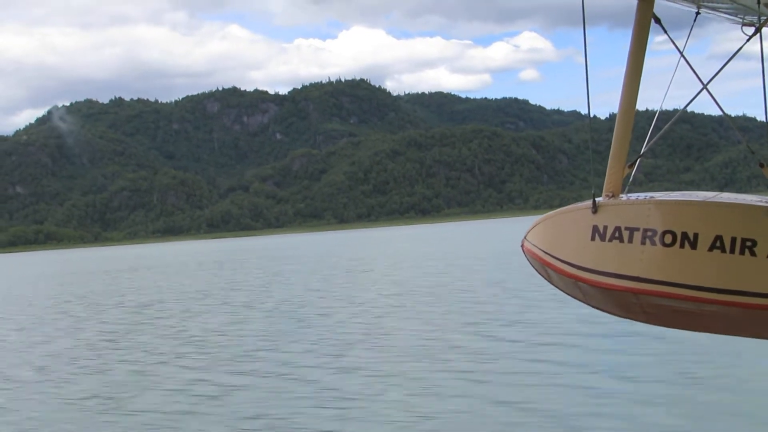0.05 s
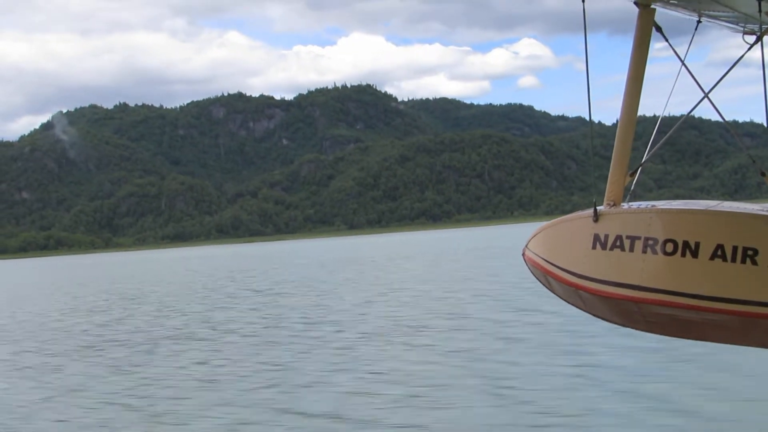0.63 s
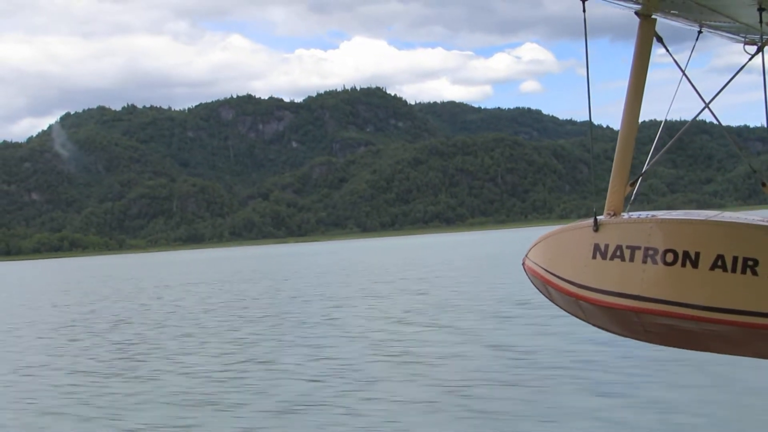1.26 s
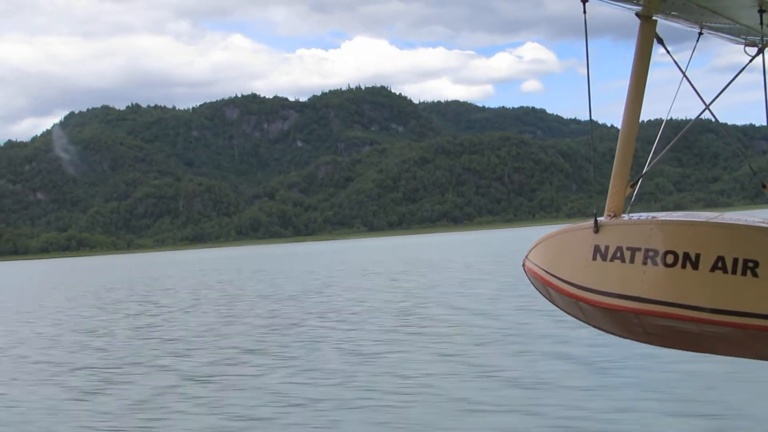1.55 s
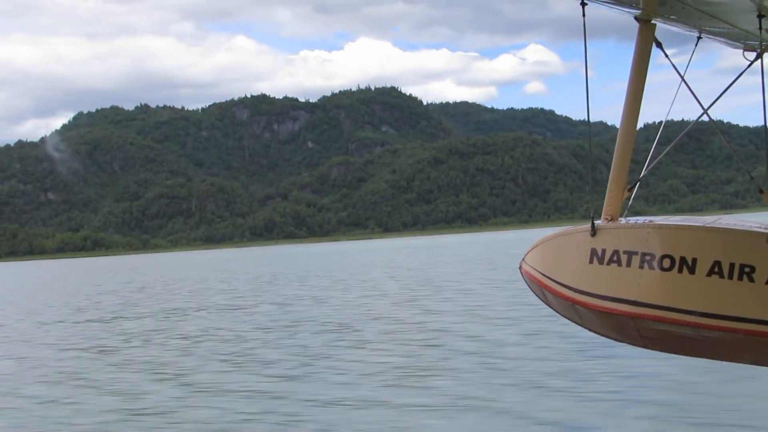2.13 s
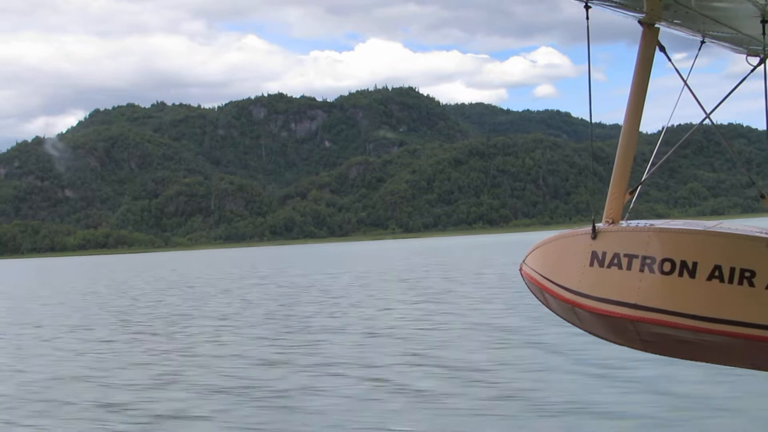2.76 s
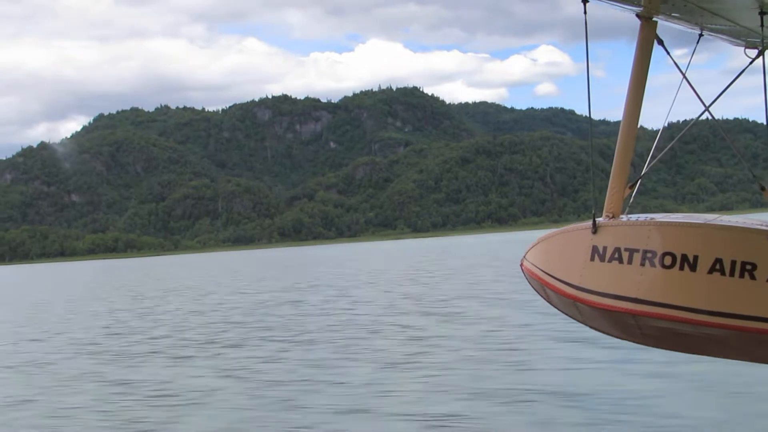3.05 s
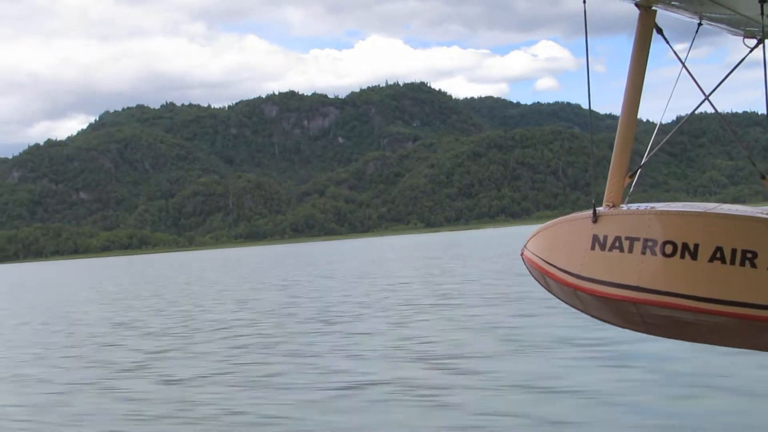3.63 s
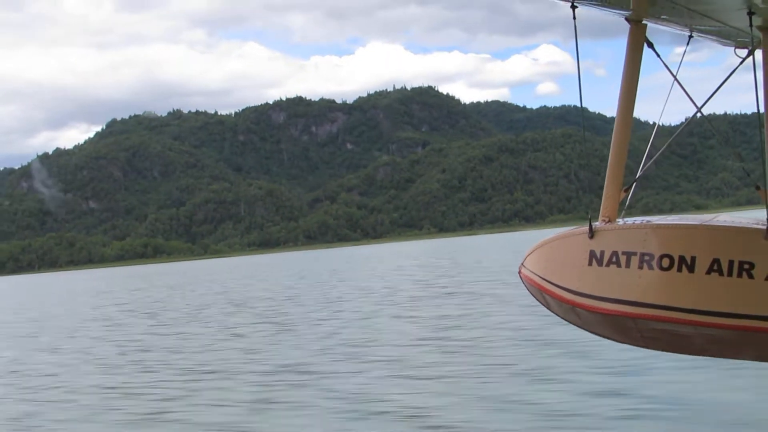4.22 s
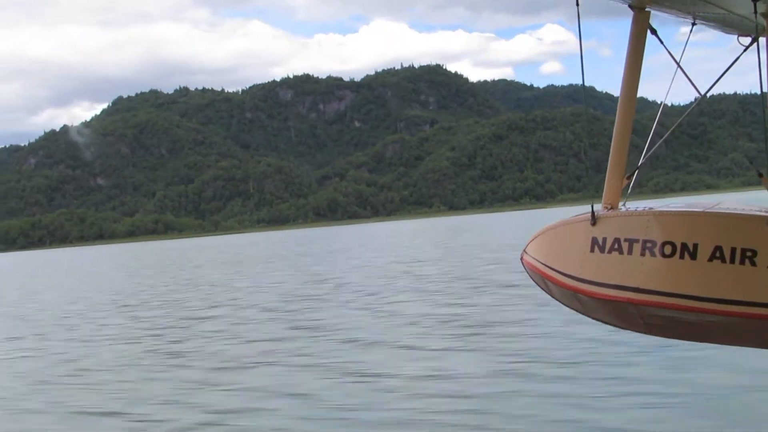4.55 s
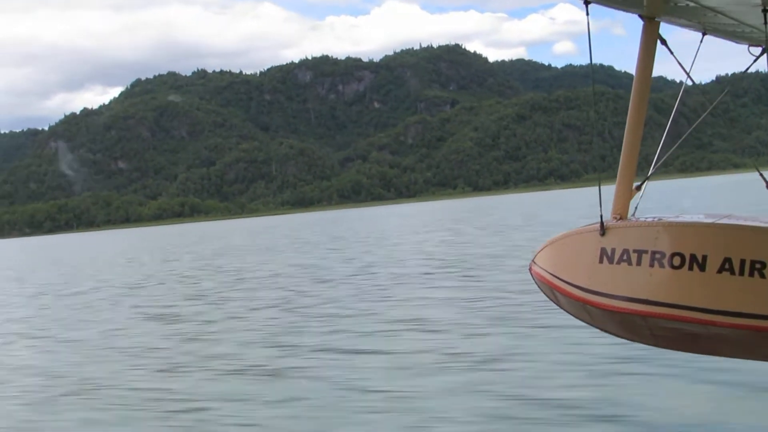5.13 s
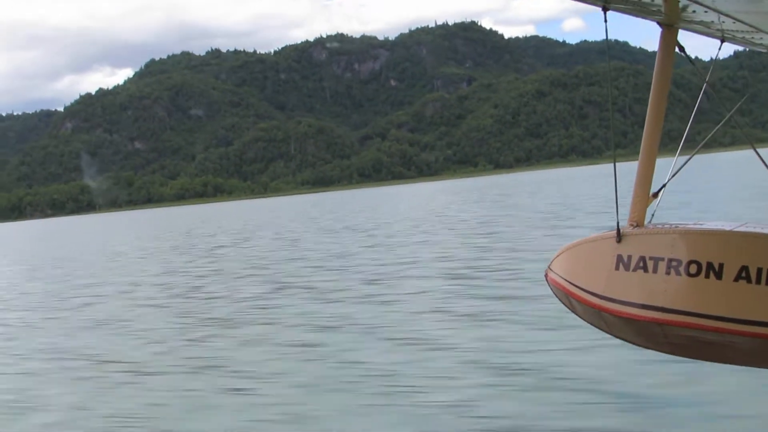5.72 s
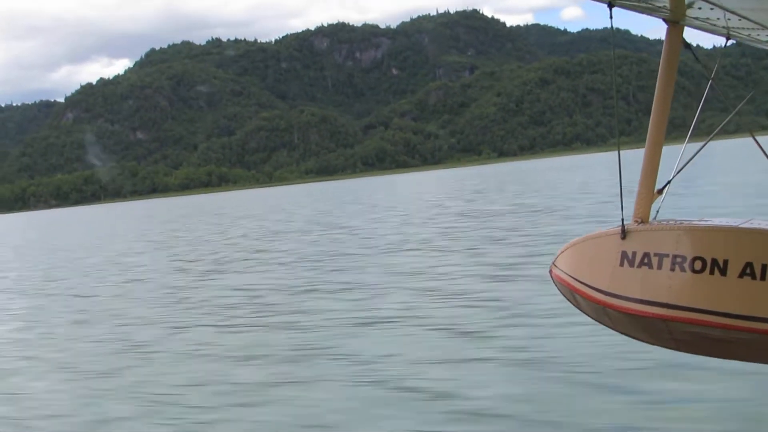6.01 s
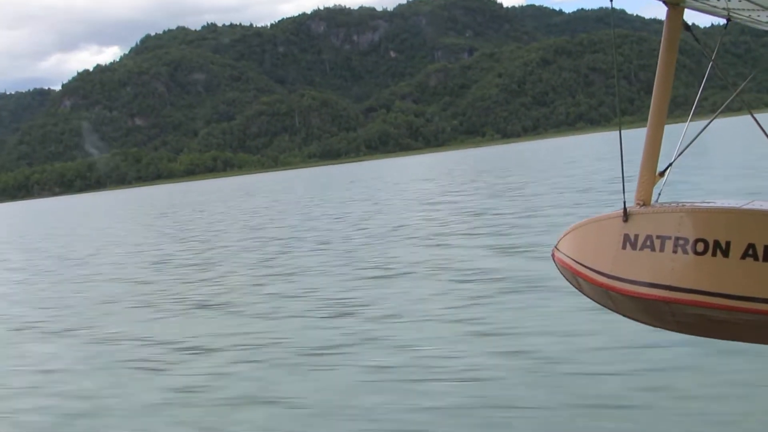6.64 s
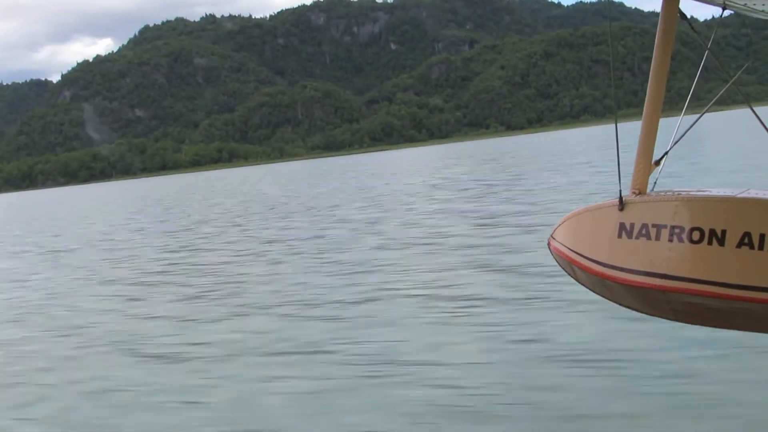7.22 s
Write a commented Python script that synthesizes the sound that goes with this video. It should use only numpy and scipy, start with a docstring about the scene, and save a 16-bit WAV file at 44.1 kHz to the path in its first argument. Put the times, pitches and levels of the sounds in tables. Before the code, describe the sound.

A seaplane lands on water, heard from inside: throbbing engines and wind give way to rushing spray and hull rumble.

```python
"""A twin-engined seaplane settles on a lake, heard from a stereo microphone inside the cabin.
First two nine-cylinder radials, slightly out of step, throb and rasp over the slipstream.
After three seconds the hull touches and skims the water, and single sharp crackles dot the drone.
Then the engines are throttled back; hull rumble, low thumps and the hiss of spray take over."""
import sys
import numpy as np
from scipy import signal
from scipy.fft import rfft, irfft
from scipy.io import wavfile
from scipy.ndimage import uniform_filter1d

SR = 44100
rng = np.random.default_rng(int(sys.argv[2]) if len(sys.argv) > 2 else 0)


def wav_out(sig):
    """Save sig, one row per channel (or a flat mono array), as 16-bit PCM at SR to the path in sys.argv[1]."""
    wavfile.write(sys.argv[1], SR, np.round(np.clip(np.atleast_2d(sig).T, -1, 1) * 32767).astype(np.int16))


N = 329427
TIME = np.arange(N) / SR
FREQS = np.fft.rfftfreq(N, 1 / SR)


def amp(db):
    """Decibels to gain."""
    return 10 ** (np.asarray(db) / 20)


def unit(x):
    """Scales to rms 1."""
    return x / np.sqrt(np.mean(x ** 2) + 1e-20)


def over_time(rows):
    """Each column of a time table, at every sample."""
    times_s, *columns = np.transpose(rows)
    return [np.interp(TIME, times_s, column) for column in columns]


def spectrum(rows):
    """A frequency table at every bin, joined up on a log-frequency axis."""
    hz, values = np.transpose(rows)
    return np.interp(np.log(FREQS + 1), np.log(hz), values)


def wander(rate_hz):
    """Random drift of rms 1."""
    knots = rng.standard_normal(4096)
    return unit(np.interp(TIME * rate_hz, np.arange(len(knots)), knots))


def stereo_noise(shape_db):
    """Coloured noise on two channels, alike in the bass and nearly unrelated in the high treble."""
    # likeness of left and right: frequency_hz, correlation
    likeness = [(30, 0.99), (250, 0.99), (400, 0.85), (600, 0.22), (900, 0.83), (1400, 0.75), (2500, 0.59),
                (5000, 0.64), (8000, 0.1), (13000, -0.2)]
    correlation = np.clip(spectrum(likeness), -1, 1)
    mid, side = rfft(rng.standard_normal((2, N))) * amp(shape_db)
    mid, side = mid * np.sqrt(1 + correlation), side * np.sqrt(1 - correlation)
    return unit(irfft([mid + side, mid - side], N))


def resonance_db(hz, centre_hz, width_hz, peak_db):
    """Bell-shaped lift around one resonance."""
    return peak_db / (1 + (2 * (hz - centre_hz) / width_hz) ** 2)


def cabin_boom_db(hz):
    """The air in the cabin booms as a note slides into its resonance."""
    return resonance_db(hz, centre_hz=181.3, width_hz=9.7, peak_db=3.75)


def slipstream(level_db=-43.5):
    """Air rushes steadily past outside, and the struts and wires sing faintly in it."""
    # air over the cabin: frequency_hz, density_db
    rush = [(100, -6.5), (450, -3), (650, 1.5), (900, 1.5), (1150, -2), (1500, -1.5), (1950, -5),
            (3200, -5.5), (3800, -6), (5000, -12), (7000, -14.5), (10500, -18.5), (13000, -20),
            (14500, -29.5)]
    # whistles of the rigging: pitch_hz, width_hz, above_rush_db
    wires = [(821, 50, 7), (920, 80, 4), (1368, 40, 6), (2250, 200, 2), (2703, 70, 4), (3050, 150, 4),
             (4380, 70, 5), (4680, 130, 4)]
    whistles_db = sum(resonance_db(FREQS, *wire) for wire in wires)
    return amp(level_db + .5 * wander(60)) * stereo_noise(spectrum(rush) + whistles_db)


def water_contact(touch_s=3.19, settle_s=0.16):
    """Gains of sheets, mist and rumble: they start at touchdown, follow the drag and ride the waves."""
    # how hard the hull ploughs the lake: time_s, drag_db
    plough = [(3.4, -20), (4.2, -13.5), (4.48, -8), (5.0, -6), (5.7, -3), (6.4, -0.76), (7.25, .5),
              (7.47, -1.5)]
    # wave crests (+) and troughs (-): middle_s, half_length_s, sheets_db, mist_db, rumble_db
    waves = [(3.636, 0.29, 9.5, 13.5, 7), (4.595, 0.14, 2, 6.5, 0), (4.8, 0.11, 1, -2, 2),
             (5.203, 0.053, 2.5, 3, 4), (5.288, 0.023, -.5, 1, -8), (5.686, 0.19, -0.4, -2, -3),
             (7.15, 0.062, 0, 0, 2.5)]
    drag_db, = over_time(plough)
    sheets_db = -28 + drag_db
    mist_db = -33.5 + 1.46 * drag_db
    rumble_db = -17 + 0.44 * drag_db
    waves_db = sum(np.outer(dbs, np.exp(-((TIME - s) / half_s) ** 2)) for s, half_s, *dbs in waves)
    contact = np.clip((TIME - touch_s) / settle_s, 0, 1)
    return contact * amp(np.array([sheets_db, mist_db, rumble_db]) + waves_db)


def spray(sheets_gain, mist_gain, flutter_db=0.88, grain_db=0.4):
    """Just outside, sheets of water rush past and break into a hissing mist of drops."""
    # rushing water: frequency_hz, density_db
    sheets_colour = [(150, -1.5), (450, -0.5), (680, -5), (830, 0), (1100, 0), (1400, 1.5), (2200, -3),
                     (3000, -8), (3700, -15), (5000, -29), (9000, -30.5)]
    # fine drops: frequency_hz, density_db
    mist_colour = [(1000, -10), (3000, 6.5), (4700, -0.5), (6500, -3), (8500, -7), (10500, -7),
                   (13000, -11), (14000, -23), (14600, -27)]
    sheets = sheets_gain * stereo_noise(spectrum(sheets_colour))
    mist = mist_gain * stereo_noise(spectrum(mist_colour))
    splashes = unit(amp(flutter_db * wander(45) + grain_db * wander(830)))
    return splashes * (sheets + mist)


def hull(rumble_gain, airframe_db=-38.5, lumps_db=1.0, boom_share=0.75):
    """The cabin rumbles faintly aloft, and hard as the hull ploughs the water."""
    # rumble inside the cabin: frequency_hz, density_db
    rumble_colour = [(15, -22), (30, -20), (45, -4), (62, 2.5), (90, -5.5), (115, -4.5), (150, -2),
                     (180, 1.5), (222, -6.5), (270, -2.5), (330, -9.5), (420, -17.5), (600, -31.5),
                     (1200, -63.5)]
    # lift of the rumble below 100 Hz: time_s, gain_db
    deep_lift = [(0, -12), (1.8, 0.5), (3.2, -2.5), (4.2, 1.5), (4.7, -2), (5.4, -3), (7.2, 1.5)]
    deep_db, = over_time(deep_lift)
    rumble = stereo_noise(spectrum(rumble_colour) + boom_share * cabin_boom_db(FREQS))
    deep = signal.sosfiltfilt(signal.butter(4, 100, fs=SR, output="sos"), rumble)
    rumble += (amp(deep_db) - 1) * deep
    return np.hypot(rumble_gain, amp(airframe_db)) * amp(lumps_db * wander(22)) * rumble


def crackles_and_thumps():
    """Single sharp crackles in the drone, then low thumps."""
    # short damped pulses: start_s, level_db, pitch_hz, swell_s
    pulses = [(3.66, -8.5, 377, 0.0011), (3.725, -16, 440, .0008), (3.779, -14, 440, 0.00087),
              (3.846, -18, 500, 0.00054), (3.961, -17.5, 480, 0.00064), (4.056, -21, 480, 0.0009),
              (4.204, -22, 560, .0006), (5.066, -8, 188, 0.0032), (5.203, -9.5, 194, 0.0043),
              (6.441, -19, 430, 0.0045)]
    out = np.zeros(N)
    for start_s, level_db, pitch_hz, swell_s in pulses:
        age = np.maximum(TIME - start_s, 0)
        swell = age / swell_s
        out -= amp(level_db) * swell * np.exp(1 - swell) * np.sin(2 * np.pi * pitch_hz * age)
    return out


def drone_rasp(turns, speed, cusp_s=.00029, ring_s=.0016, ring_hz=470, scatter_db=1.8, weak_db=-16):
    """An overload-like crackle on the drone's loudest crests, every few pulses."""
    # raspy moments: middle_s, half_length_s, level_db, pulses_per_crack
    rasps = [(.568, .085, -19.5, 2), (1.305, .15, -17, 6), (1.851, .085, -14.5, 2), (2.551, .11, -16.5, 3),
             (3.1, .1, -14.5, 2)]
    pulses = 3 * turns
    crest = np.round(pulses).astype(int)
    envelope = np.zeros(N)
    for middle_s, half_s, level_db, pulses_per_crack in rasps:
        between_cracks = (crest - crest[round(middle_s * SR)]) % pulses_per_crack > 0
        window = np.exp(-((TIME - middle_s) / half_s) ** 4)
        envelope += amp(level_db + weak_db * between_cracks) * window
    from_crest_s = abs(pulses - crest) / (3 * speed)
    # each crest has its own strength and phase, so the crackle is rough
    strength, phase = rng.standard_normal((1024, 2))[crest].T
    size = amp(scatter_db * np.minimum(strength, 1))
    cusps = .85 * np.exp(-from_crest_s / cusp_s)
    grit = .35 * np.cos(2 * np.pi * ring_hz * from_crest_s + phase) + .55 * wander(3000)
    cracks = cusps + grit * np.exp(-from_crest_s / ring_s)
    midrange = signal.butter(2, [300, 1450], "bandpass", fs=SR, output="sos")
    return signal.sosfilt(midrange, envelope * size * cracks)


def engine_lead(speed, in_step_s=1.26, slip_hz=.505, slip_per_sag=.13, approach_hz=31):
    """Turns by which one shaft leads its twin; it gains faster as the throttle closes."""
    slip = slip_hz + slip_per_sag * (approach_hz - speed)
    lead = np.cumsum(slip) / SR
    return lead - np.interp(in_step_s, TIME, lead)


def engines(exhaust_lag_turns=0.064, waver=0.022, uneven=0.32, roar_db=-31.5, drone_db=0.04):
    """Three-bladed propellers and nine-cylinder exhausts close by; each order beats with its twin."""
    # mean of both engines: time_s, shaft_turns_per_s, level_db
    throttle = [(0, 31.15, -1.5), (.8, 31.0, 0), (1.8, 30.77, -.5), (2.6, 30.68, 0), (3.8, 30.37, -1),
                (4.55, 29.75, -6), (4.95, 28.9, -10.5), (5.6, 27, -15.5), (7.47, 25.5, -13)]
    # engine notes: multiple_of_shaft_speed, faster_engine_db, slower_engine_db
    orders = [(1, -61.5, -53), (1.5, -50, -61.5), (2, -33, -30), (2.5, -35.5, -46), (3, -21, -19.5),
              (3.5, -42.5, -41.5), (4, -31.5, -29.5), (4.5, -21.5, -27.5), (5, -46, -41.5), (5.5, -40, -48),
              (6, -27, -22), (7, -34.5, -57), (7.5, -29, -43.5), (8.5, -29, -49.5), (9, -47, -47.5),
              (9.5, -52.5, -42), (10.5, -60, -39), (12, -60, -46.5), (13.5, -53, -62), (15, -69, -85)]
    # exhaust roar between the notes: frequency_hz, density_db
    roar_colour = [(20, -23.5), (45, -12.5), (70, -12), (130, -2.5), (180, 5.5), (220, -8.5), (280, 3.5),
                   (330, 5), (420, -10.5), (520, -14.5), (1000, -46)]
    speed, level_db = over_time(throttle)
    lead = engine_lead(speed)
    turns = np.cumsum(speed) / SR - 1 / 7
    fast, slow = turns + lead / 2, turns - lead / 2
    drone = np.zeros(N)
    for order, fast_db, slow_db in orders:
        from_blades = order % 3 == 0
        # unequal cylinders make the orders between those of blades and firing, and these waver more
        regular = order % 1.5 == 0
        phase = rng.random() * (not regular)
        lag = 0 if from_blades else exhaust_lag_turns
        pair = amp(fast_db) * np.cos(2 * np.pi * (order * fast + phase))
        pair += amp(slow_db) * np.cos(2 * np.pi * (order * (slow + lag) + phase))
        pair *= amp(cabin_boom_db(order * speed))
        drone += np.sqrt(2) * pair * (1 + (waver if regular else uneven) * wander(10))
    roar = amp(roar_db) * stereo_noise(spectrum(roar_colour))
    return amp(level_db) * (amp(drone_db) * drone + roar) + drone_rasp(fast, speed)


def scene():
    """At the microphone in the cabin, the deep bass, air and spray are a little louder on the left."""
    sheets_gain, mist_gain, rumble_gain = water_contact()
    leftward = np.array([[1], [-1]])
    cabin = engines() + hull(rumble_gain) + crackles_and_thumps()
    bass = signal.sosfiltfilt(signal.butter(2, 170, fs=SR, output="sos"), cabin)
    rush = (slipstream() + spray(sheets_gain, mist_gain)) * amp(.45 * leftward)
    fade_in = np.minimum(TIME / .005, 1)
    return fade_in * (cabin + .125 * leftward * bass + rush)


def record(dry, threshold_db=-5.5, recovery_db_per_s=9, duck_share=0.55, edge_hz=14500):
    """A limiter ducks after the highest crests; then two narrow notches and the band limit."""
    # notches in the hiss, near 4 and 8 kHz: centre_hz, width_hz
    notches = [(3950, 305), (7890, 190)]
    peak_db = 20 * np.log10(abs(dry).max(0) + 1e-6)
    fall_db = TIME * recovery_db_per_s
    held_db = np.maximum.accumulate(peak_db + fall_db) - fall_db
    over_db = np.maximum(held_db - threshold_db, 0)
    out = dry / amp(duck_share * uniform_filter1d(over_db, size=200))
    for centre_hz, width_hz in notches:
        out = signal.lfilter(*signal.iirnotch(centre_hz, centre_hz / width_hz, fs=SR), out)
    band_limit = signal.firwin(511, edge_hz, window=("kaiser", 9), fs=SR)
    return signal.oaconvolve(out, band_limit[None], "same")


dry = scene()
out = record(dry)
wav_out(out)
```